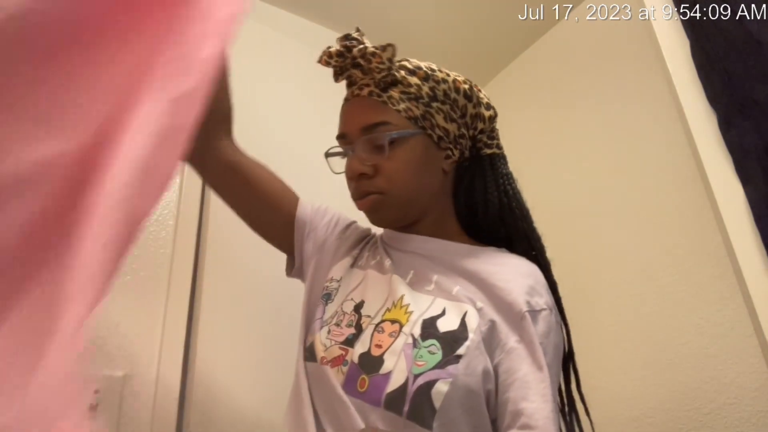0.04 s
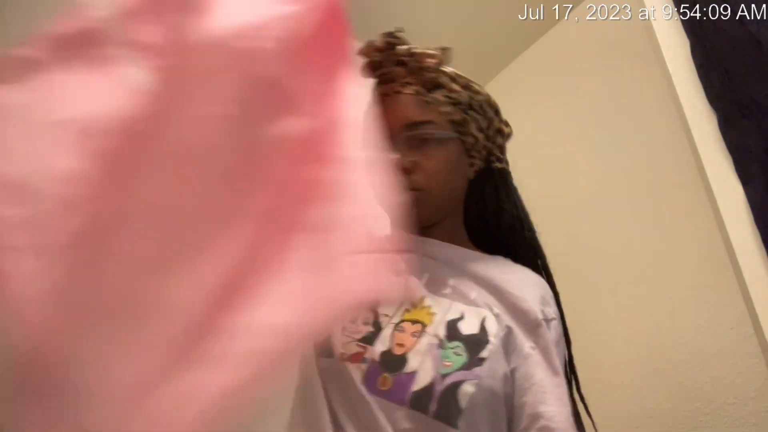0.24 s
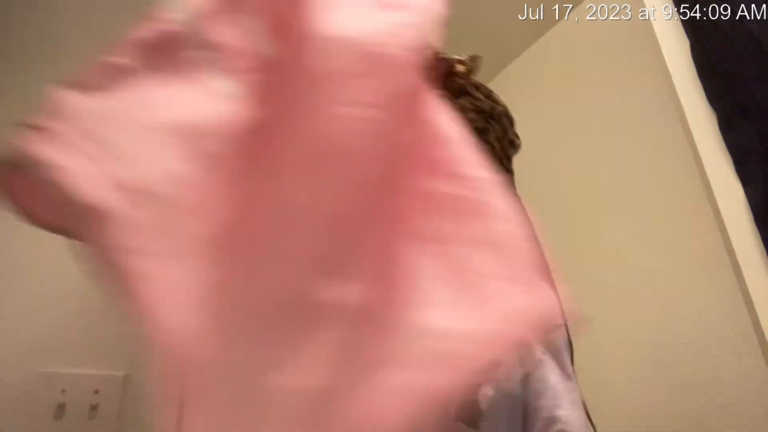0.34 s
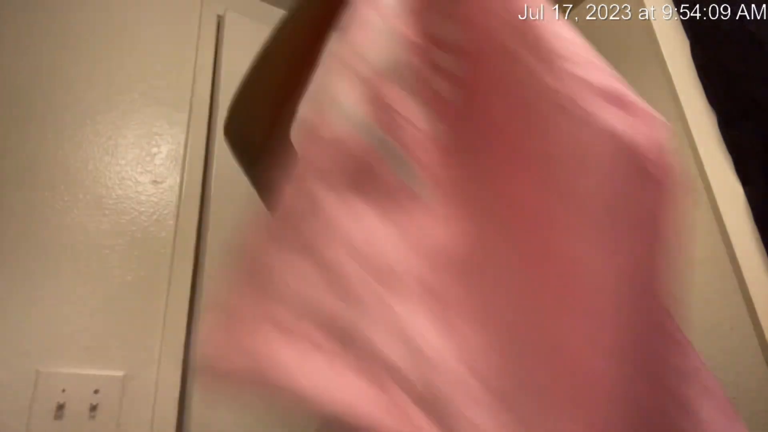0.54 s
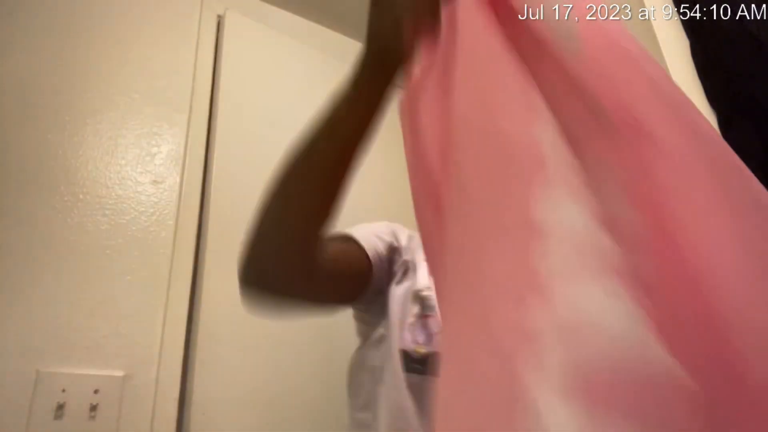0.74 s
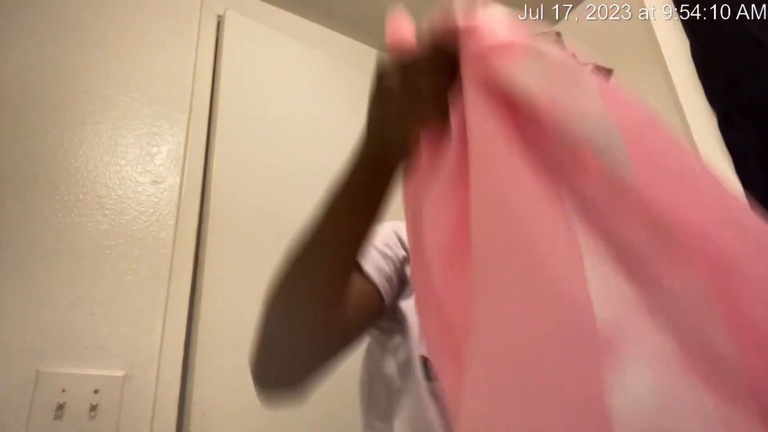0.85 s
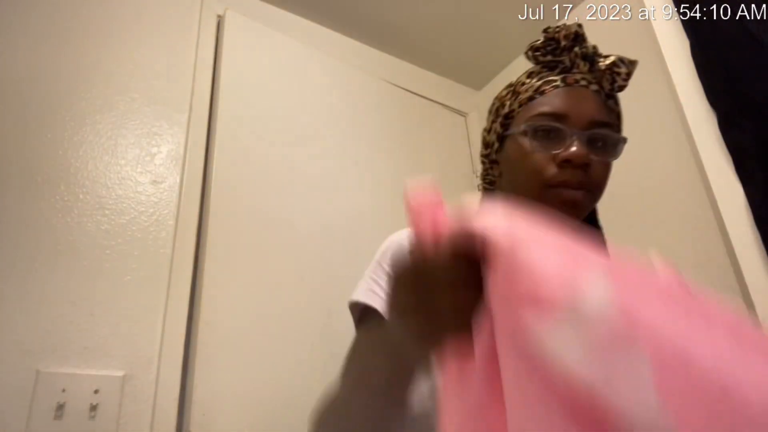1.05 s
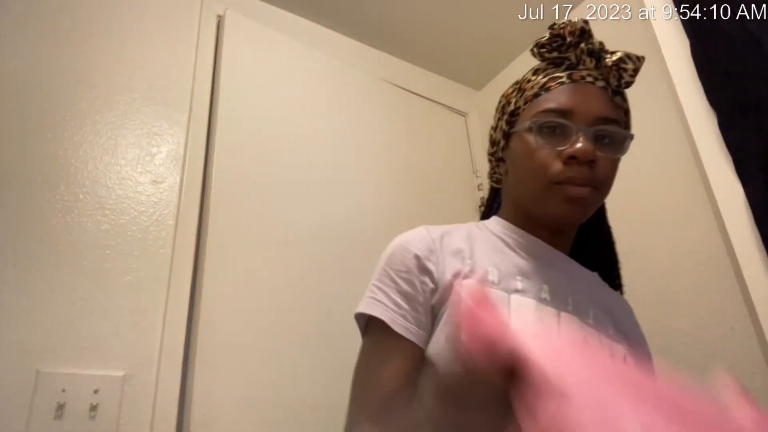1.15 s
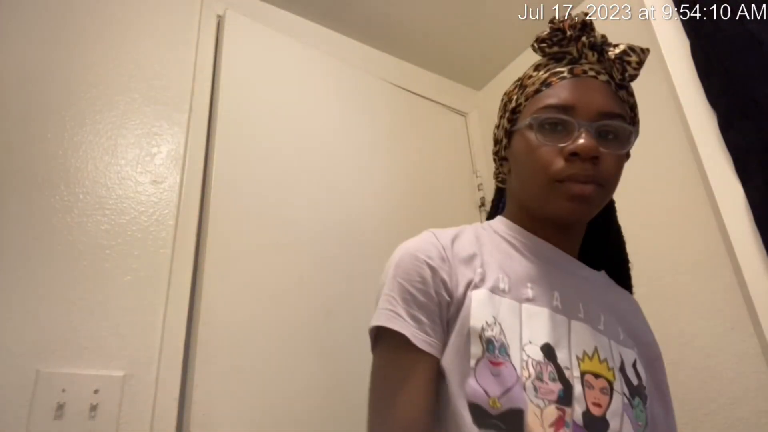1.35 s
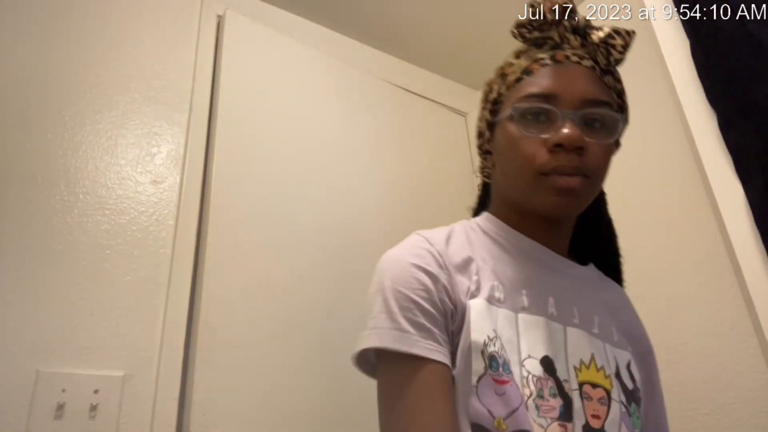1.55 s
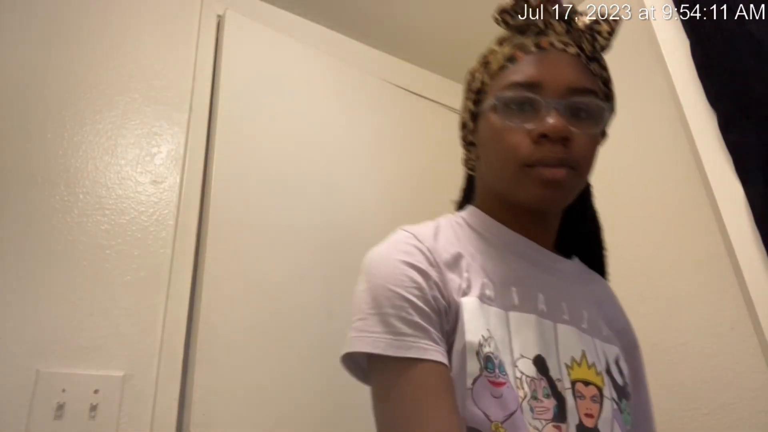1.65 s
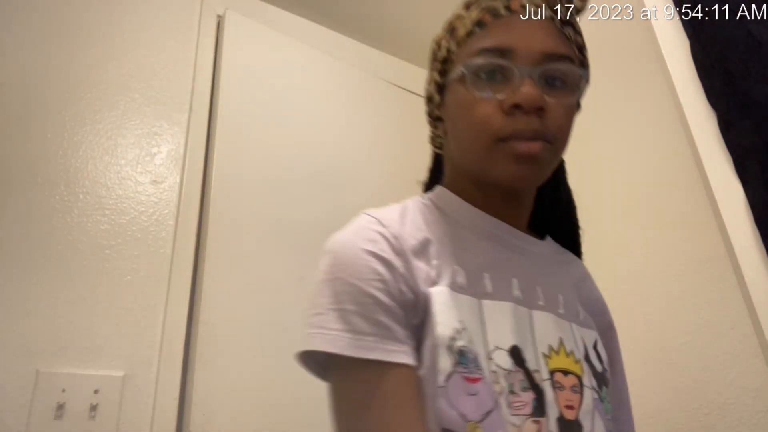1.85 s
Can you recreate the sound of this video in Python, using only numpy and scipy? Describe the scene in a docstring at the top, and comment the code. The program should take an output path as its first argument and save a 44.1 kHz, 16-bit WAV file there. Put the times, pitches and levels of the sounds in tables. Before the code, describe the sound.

A cloth is flung out close to the microphone and cracks loudly like a whip at about 0.2 seconds, with a thinner, quieter crack at 0.3. Both ring briefly off the hard walls of a small room. The cloth then rustles faintly and gives three small, bright ticks around 1.4 to 1.5 seconds. A ventilation fan rushes and hums quietly throughout, until about 1.9 seconds.

```python
"""A ventilation fan rushes and hums in a small hard-walled room, and a cloth rustles faintly.
Flung out close to the microphone, the cloth cracks like a whip; a loose corner gives a thinner crack.
The walls return both cracks as a dense, ringing slap.
The cloth then rustles softly and gives three small ticks while the fan runs on."""
import sys
import numpy as np
from scipy import signal
from scipy.fft import rfft, irfft
from scipy.io import wavfile

SR = 44100
rng = np.random.default_rng(int(sys.argv[2]) if len(sys.argv) > 2 else 0)


def master(y):
    """Save y as 16-bit WAV."""
    cut = np.clip(np.atleast_2d(y).T, -1, 1)
    pcm = np.round(cut * 32767)  # scale
    wavfile.write(sys.argv[1], SR, pcm.astype(np.int16))


N = 83790
FREQS_HZ = np.arange(N // 2 + 1) * SR / N


def gain(db):
    """Turn decibels into a number to multiply by."""
    return 10 ** (np.asarray(db) / 20)


def unit(x):
    """Scale a sound to a standard strength (rms 1)."""
    return x / (np.std(x) + 1e-12)


def look_up(hz, table, column=1):
    """Read a table at any pitch, sliding between its rows."""
    rows = np.array(table, float)
    return np.interp(np.log(hz + 1), np.log(rows[:, 0]), rows[:, column])


def colour(noise, table):
    """Balance the lows and highs of a noise, at standard strength."""
    return unit(irfft(rfft(noise) * gain(look_up(FREQS_HZ, table)), N))


def narrow_noise(hz, width_hz):
    """Noise gathered around one pitch, at standard strength."""
    phases = np.exp(2j * np.pi * rng.random(N // 2 + 1))
    return unit(irfft(phases / (1 + ((FREQS_HZ - hz) / width_hz) ** 2), N))


def grainy(clicks_per_s, share):
    """Smooth noise with random clicks that carry a share of its power."""
    clicks = rng.choice([-1, 1], N) * (rng.random(N) < clicks_per_s / SR)
    return np.sqrt(1 - share) * rng.standard_normal(N) + np.sqrt(share) * unit(clicks)


def fade(age, fade_s):
    """Full until age 0, then 60 dB quieter every fade_s."""
    return np.exp(-np.log(1000) * np.maximum(age, 0) / fade_s)


def burst(age, fall_s):
    """Start suddenly, then drop to about a third every fall_s."""
    return (age >= 0) * np.exp(-np.maximum(age, 0) / fall_s)


# Tone of the rushing air: pitch_hz, relative_db
FAN_COLOUR = [(15, -32), (28, -15), (50, 1), (80, -19.5), (110, -3), (170, -1), (215, -4), (280, -10.5),
              (345, -7.5), (405, -14), (490, -7.5), (650, -9), (730, -15.5), (810, -8), (930, -13),
              (1130, -10.5), (1480, -22), (2400, -28), (4000, -35), (8000, -44), (16000, -61)]
# Hums of the fan and its duct: pitch_hz, width_hz, level_db
FAN_HUMS = [(52.7, 6.9, -45.5), (119.2, 3.7, -50.5), (170.7, 8, -50), (561, 9.2, -58.5), (661, 13, -56),
            (816, 10, -57), (1081, 15, -56.5), (1137, 14, -59.5)]

def fan():
    """The fan pushes a gently wavering rush of air, and it and its duct hum."""
    air = colour(rng.standard_normal(N), FAN_COLOUR)
    level_db = -40.5 - 0.53 * narrow_noise(hz=8, width_hz=13)
    hum = sum(gain(db) * narrow_noise(hz, width_hz) for hz, width_hz, db in FAN_HUMS)
    return air * gain(level_db) + hum


# How loud the moving cloth is: time_s, level_db
RUSTLE_LEVELS = [(0, -62.5), (.2, -68), (.5, -65), (.75, -68.5), (.84, -64.5), (.95, -63.5), (1.08, -62),
                 (1.21, -67), (1.32, -62.5), (1.55, -61), (1.66, -59), (1.9, -60.5)]
# Tone of the rustle: pitch_hz, relative_db
RUSTLE_COLOUR = [(500, -19), (2500, 6.5), (4500, -5), (8000, -1.5), (12000, -3.5), (16000, -6.5)]
FIBRE_CLICKS_PER_S, FIBRE_SHARE = 4000, 0.22

def rustle(t):
    """Fibres brush over each other as the cloth moves, with one brief, faint hiss."""
    fibres = colour(grainy(FIBRE_CLICKS_PER_S, FIBRE_SHARE), RUSTLE_COLOUR)
    level_db = np.interp(t, *np.array(RUSTLE_LEVELS).T)
    hiss_swell = np.exp(-((t - 1.075) / 0.075) ** 2)  # loudest at 1.075 s
    hiss = narrow_noise(hz=5220, width_hz=300) * hiss_swell
    return fibres * gain(level_db) + gain(-65.5) * hiss


# Tone of a crack: pitch_hz, relative_db
CRACK_COLOUR = [(100, -10), (270, 2.5), (400, -4.5), (600, 0), (1200, -0.5), (1750, -1.5), (2050, -2),
                (2500, -0.5), (3700, -4), (4400, -10), (5600, -8.5), (8000, -8.5), (11500, -12.5),
                (16000, -18)]
# Strong echoes from the near and the far wall: delay_s, relative_db, fall_s
WALL_ECHOES = [(.0065, -0.5, 0.0077), (0.028, -6, 0.01)]
# How the room's many echoes gather and die: pitch_hz, build_s, fade_s
ROOM_SLAP = [(250, 0.023, .38), (810, 0.012, 0.24), (1730, 0.0048, 0.23), (3520, 0.017, 0.19),
             (7150, 0.0069, 0.23), (15000, .008, 0.13)]
TREBLE_HZ, SLAP_SWELL_DB, SLAP_HOLD_S = 4580, 3.5, 0.0034

def crack(age, low_cut_hz, treble_db):
    """The cloth snaps, two walls echo it, and more echoes blur into a slap."""
    f = FREQS_HZ + 1
    treble = gain(treble_db * f ** 2 / (f ** 2 + TREBLE_HZ ** 2))
    low_cut = 1 / np.hypot(1, (low_cut_hz / f) ** 2)
    echoes = grainy(clicks_per_s=5200, share=0.22)  # each click is one wall echo
    spectrum = rfft(colour(echoes, CRACK_COLOUR)) * treble * low_cut
    direct = gain(-9) * burst(age, fall_s=0.0012)
    walls = sum(gain(db) * burst(age - delay_s, fall_s) for delay_s, db, fall_s in WALL_ECHOES)
    out = 0
    for hz in 125 * 2 ** np.arange(8):  # each octave dies at its own speed
        band = irfft(spectrum * np.maximum(1 - abs(np.log2(f / hz)), 0), N)
        build_s, fade_s = look_up(hz, ROOM_SLAP, column=1), look_up(hz, ROOM_SLAP, column=2)
        swell = gain(SLAP_SWELL_DB * (np.clip(age / build_s, 0, 1) - 0.5))
        slap = swell * fade(age - build_s - SLAP_HOLD_S, fade_s)
        out = out + band * np.hypot(direct + walls, slap)
    return out * (age >= 0)


# Notes the room rings at: pitch_hz, relative_db, fade_s
ROOM_NOTES = [(269, -11, 0.36), (648, 2.5, 0.11), (763, 3, 0.1), (880, 0.5, 0.13), (1061, 3.5, 0.14),
              (1352, 5.5, 0.082), (1609, 1, 0.13), (1749, 0, 0.11), (2450, -8.5, 0.11), (2440, -0.5, 0.1),
              (2660, -15, 0.16), (3050, -9, 0.33), (3420, -24, 0.14), (3120, -11, 0.17),
              (3544, -7.5, 0.088), (3590, -6, .18), (3895, -10, 0.24)]
RING_DELAY_S, RING_BUILD_S = 0.00304, 0.01

def room_ringing(age):
    """The room's own notes swell just after a crack and ring out."""
    age = age - RING_DELAY_S
    notes = 0
    for hz, db, fade_s in ROOM_NOTES:
        tone = np.sin(2 * np.pi * (hz * age + rng.random()))
        notes = notes + gain(db) * tone * fade(age - RING_BUILD_S, fade_s)
    return notes * np.clip(age / RING_BUILD_S, 0, 1)


# Cracks of the cloth and its corner: start_s, level_db, low_cut_hz, treble_db, ringing_db
CRACKS = [(0.2326, -15.5, 444, -1, -21.5), (0.3298, -30.5, 1510, 7, -45)]

def cloth_fling(t):
    """The flung cloth cracks twice, and each crack sets the room ringing."""
    out = 0
    for start_s, db, low_cut_hz, treble_db, ringing_db in CRACKS:
        out = out + gain(db) * crack(t - start_s, low_cut_hz, treble_db)
        out = out + gain(ringing_db) * room_ringing(t - start_s)
    return out


# Small ticks of the cloth: start_s, level_db, tail_relative_db
TICKS = [(1.3662, -37, -7), (1.4297, -41, -8.5), (1.4774, -39.5, -9)]
# Tone of a tick: pitch_hz, relative_db
TICK_COLOUR = [(1000, -27), (3500, -10), (4700, -11), (5500, -4), (7500, -2.5), (10000, -1.5),
               (12000, -6.5), (16000, -8.5)]
SCRAPE_LEAD_S, TICK_RISE_S, TICK_FALL_S = 0.007, 0.0011, 0.0019

def ticks(t):
    """Brief scrapes of the cloth lead into bright ticks, each with a short tail of room echo."""
    out = 0
    for start_s, db, tail_db in TICKS:
        age = t - start_s
        scrape = gain(-13.5) * (age > -SCRAPE_LEAD_S) * (age < TICK_RISE_S)
        hit = np.clip(age / TICK_RISE_S, 0, 1) * np.exp(-np.maximum(age - TICK_RISE_S, 0) / TICK_FALL_S)
        tail = gain(tail_db) * (age >= TICK_RISE_S) * fade(age, fade_s=0.16)
        fibres = colour(grainy(FIBRE_CLICKS_PER_S, FIBRE_SHARE), TICK_COLOUR)
        out = out + gain(db) * fibres * np.sqrt(scrape ** 2 + hit ** 2 + tail ** 2)
    return out


def scene():
    """Add the fan and the cloth's sounds together in one channel."""
    t = np.arange(N) / SR
    return (fan() + rustle(t) + cloth_fling(t) + ticks(t))[None]


def record(dry):
    """The recorder rounds off the loudest peaks and cuts the highest treble."""
    ceiling, top_hz = 0.67, 15750
    rounded = ceiling * np.tanh(dry / ceiling)
    return signal.sosfilt(signal.ellip(10, .2, 80, top_hz, fs=SR, output="sos"), rounded)


dry = scene()
out = record(dry)
master(out)
```